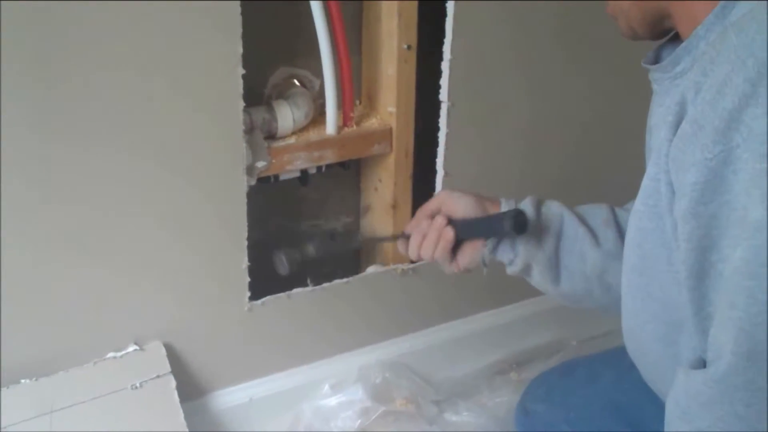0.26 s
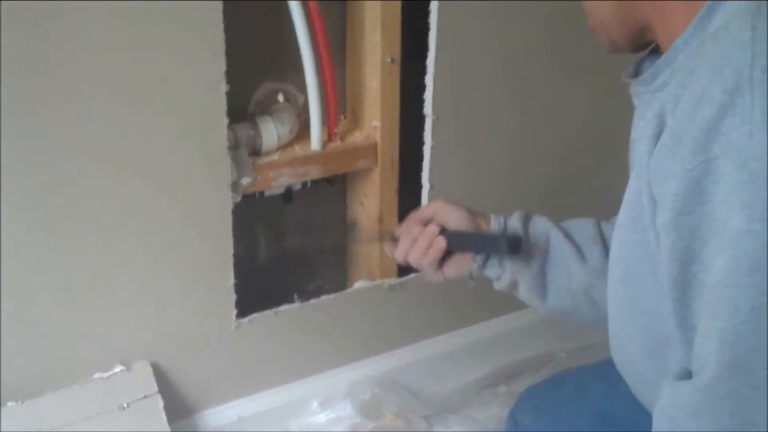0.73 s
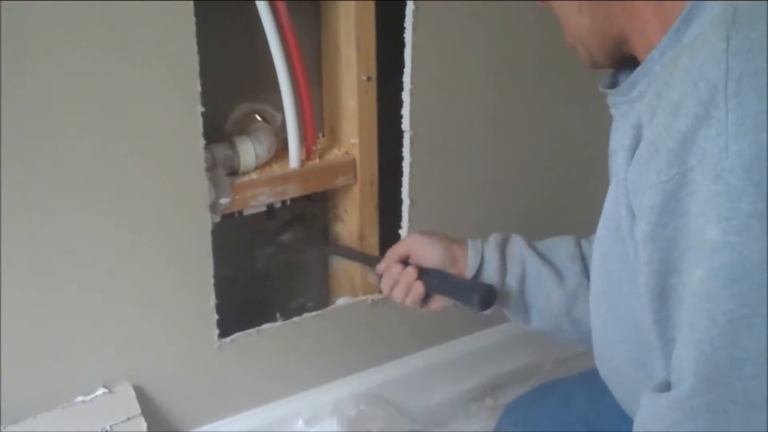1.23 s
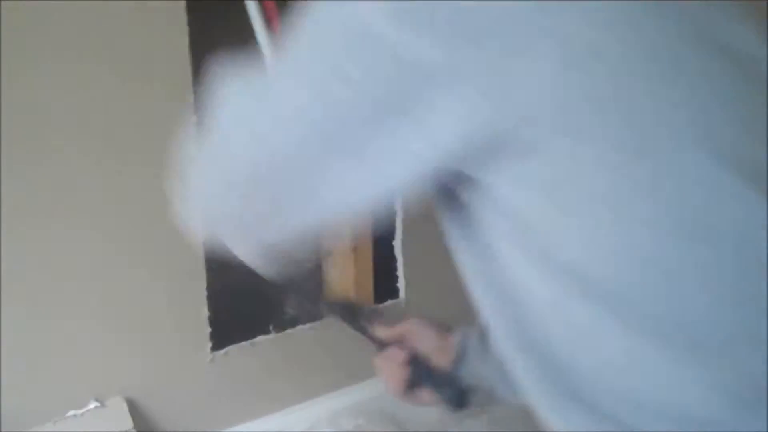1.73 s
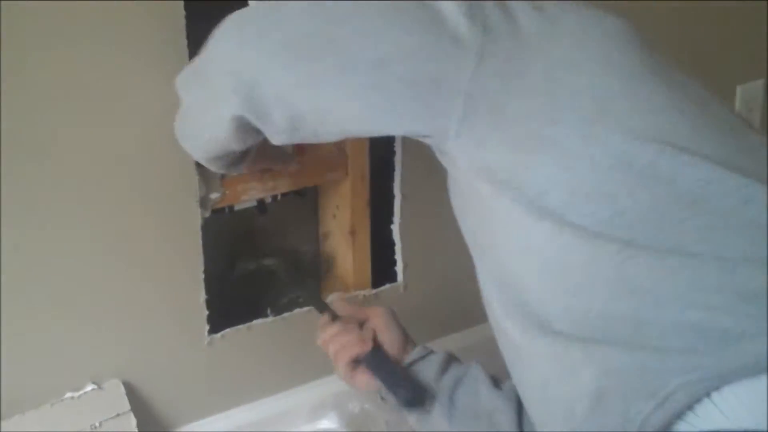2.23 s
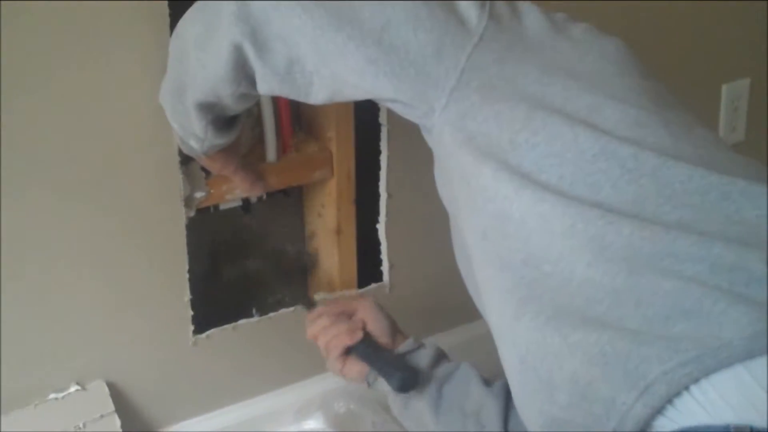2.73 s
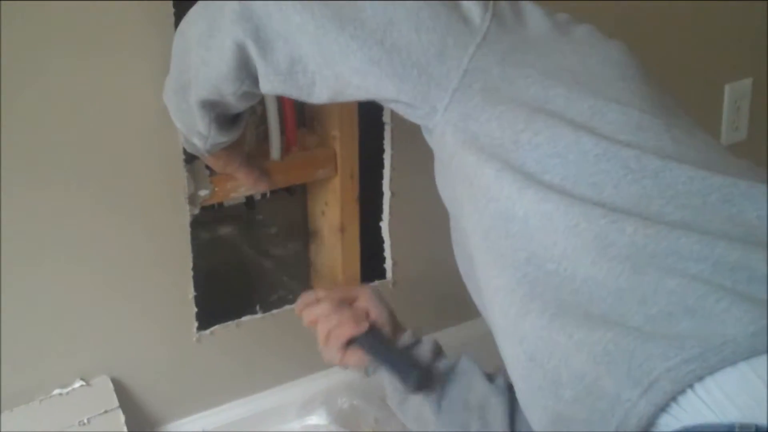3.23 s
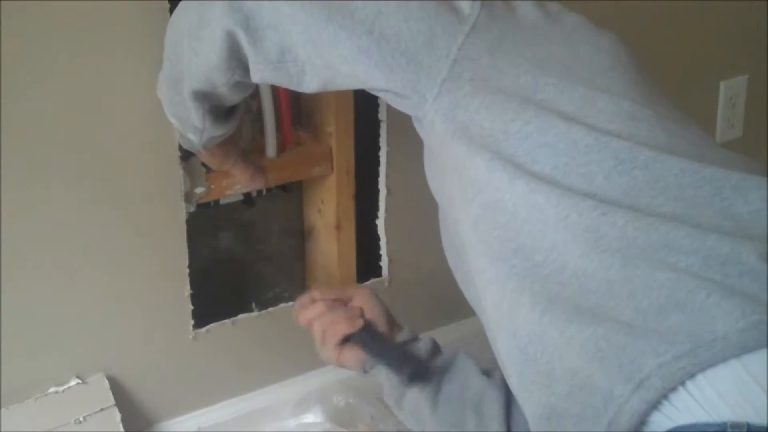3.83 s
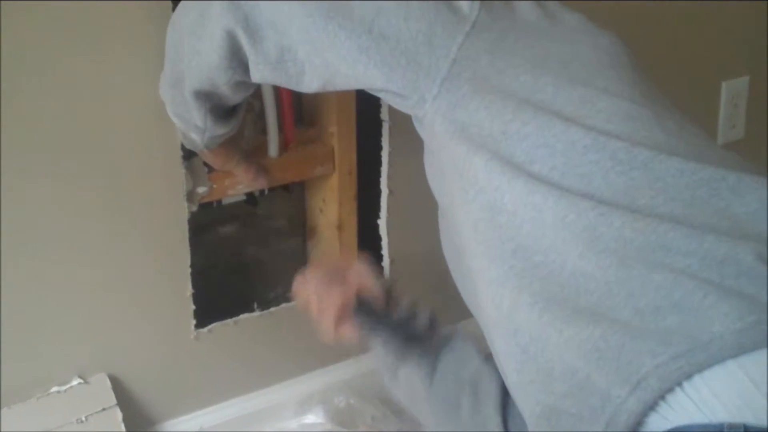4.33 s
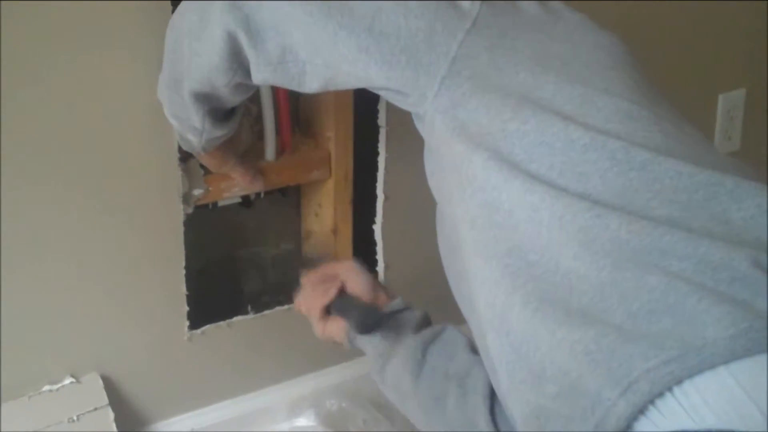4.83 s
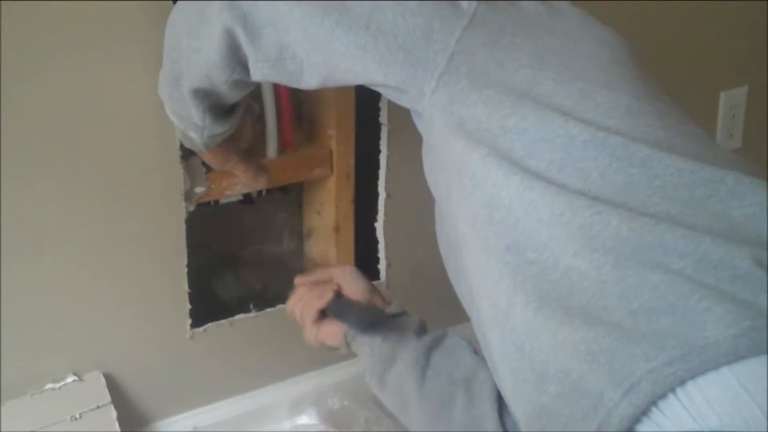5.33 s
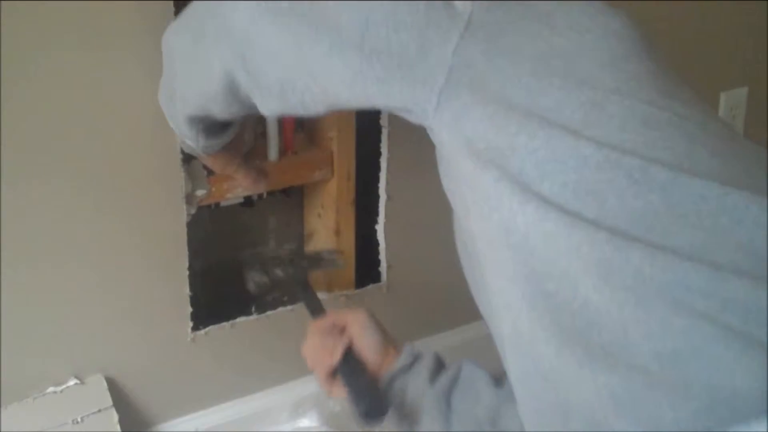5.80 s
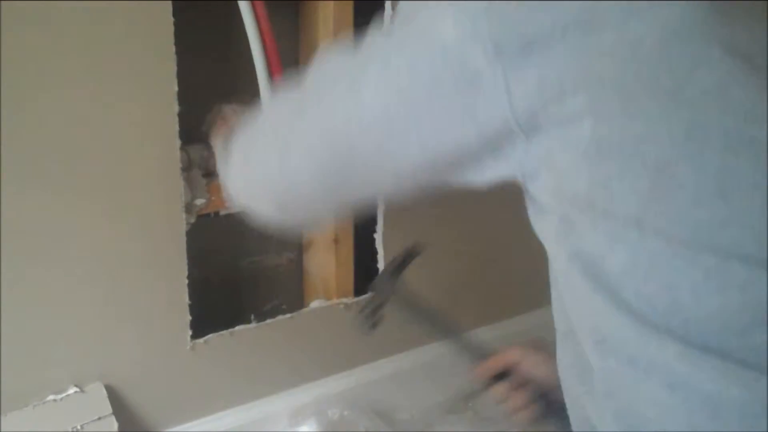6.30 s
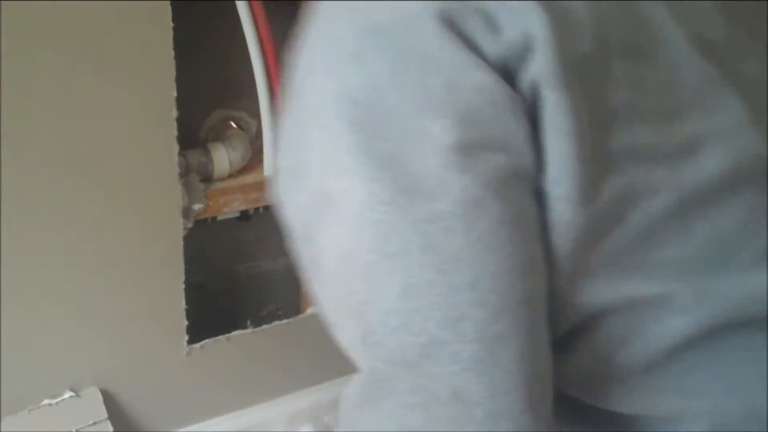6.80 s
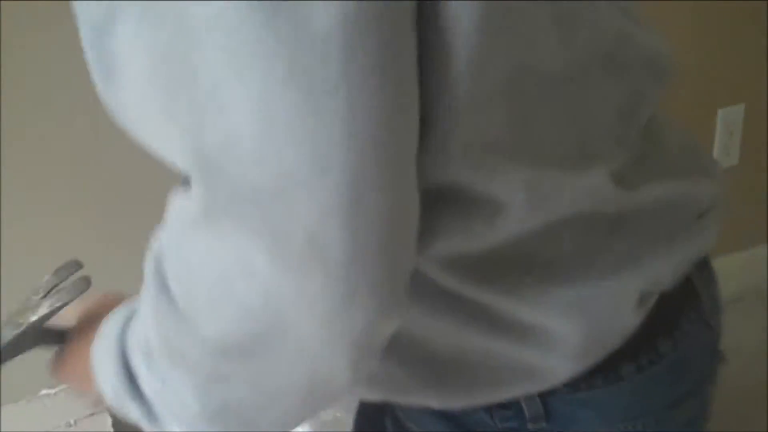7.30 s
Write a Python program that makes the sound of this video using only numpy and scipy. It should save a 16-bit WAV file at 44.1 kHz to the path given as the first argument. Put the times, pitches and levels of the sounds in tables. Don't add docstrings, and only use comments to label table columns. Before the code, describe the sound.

A hammer gives three light, bright taps on wood framing, then a rustling pause and eleven harder knocking blows in a bare room.

```python
import sys
import numpy as np
from scipy import signal
from scipy.fft import rfft, irfft, next_fast_len
from scipy.io import wavfile
from scipy.ndimage import uniform_filter1d

SR = 44100
rng = np.random.default_rng(int(sys.argv[2]) if len(sys.argv) > 2 else 0)


def wav_record(signal):
    frames = np.transpose(np.atleast_2d(signal))
    bounded = np.clip(frames, -1, 1)
    quanta = np.round(bounded * 32767).astype(np.int16)
    wavfile.write(sys.argv[1], SR, quanta)


def amplitude_ratio(level_db):
    exponent = np.asarray(level_db, float) / 20
    return 10 ** exponent


N = 332955
GRID = np.fft.rfftfreq(8192, 1 / SR)


def unit(x):
    return x / np.sqrt(np.mean(x ** 2) + 1e-20)


def along(points, hz):
    f, v = np.transpose(points)
    return np.interp(np.log(hz + 1), np.log(f + 1), v)


def filtered(x, response):
    m = next_fast_len(x.shape[-1] + 8192)
    spectrum = rfft(x, m) * response(np.fft.rfftfreq(m, 1 / SR))
    return irfft(spectrum, m)[..., :x.shape[-1]]


def resonant(peaks):
    def response(f):
        total = 0
        for k, (centre, width, db) in enumerate(peaks):
            damping = 1j * f * width
            total = total + (-1) ** k * amplitude_ratio(db) * damping / (centre * centre - f * f + damping)
        return total
    return response


def part(burst, response, db):
    sound = filtered(burst, response)
    power = np.abs(response(GRID)) ** 2
    return amplitude_ratio(db) * sound / np.linalg.norm(sound), amplitude_ratio(2 * db) * power / power.mean()


def spread(pair):
    # frequency_hz, correlation [0-1]
    likeness = [(20, 0.96), (60, .98), (250, 0.98), (600, 0.93), (1200, 0.81), (3000, 0.44), (6000, 0.25),
                (11000, 0.24)]
    turn = lambda hz: np.arccos(np.clip(along(likeness, hz), -1, 1)) / 2
    mid, side = filtered(pair, lambda hz: np.array([np.cos(turn(hz)), np.sin(turn(hz))]))
    return np.array([mid + side, mid - side])


def add(out, s, parts, wet_db):
    # frequency_hz, t60_s, tail_db
    room = [(60, .5, 3), (140, 0.47, -0.5), (255, 0.28, 8.5), (449, 0.46, 4.5), (809, 0.35, 3),
            (1470, .4, 1.5), (2830, 0.32, -4.5), (4500, 0.3, -1), (5200, 0.33, -9.5), (10100, 0.27, -3.5)]
    room_t60 = [row[:2] for row in room]
    room_db = [row[::2] for row in room]
    sound, power = (sum(p) for p in zip(*parts))
    hz, t, z = signal.stft(rng.standard_normal((2, SR * 3 // 4)), SR, nperseg=256)
    t60 = along(room_t60, hz)[:, None]
    decay = np.hypot(amplitude_ratio(-60 * t / t60), amplitude_ratio(-6.5 - 60 * t / (1.42 * t60)))
    patches = uniform_filter1d(rng.standard_normal(z.shape[1:]), 14, 0)
    clatter_db = unit(uniform_filter1d(patches, 3, 1))
    tail = signal.istft(z * decay * amplitude_ratio(clatter_db), SR, nperseg=256)[1]
    onset = np.clip(np.arange(tail.shape[1]) / (0.0054 * SR), 0, 1)
    tail = spread(tail * onset)
    colour = lambda q: np.sqrt(np.interp(q, GRID, power)) * amplitude_ratio(along(room_db, q) + wet_db)
    wet = filtered(tail / np.linalg.norm(tail[0]), colour)
    wet[:, :sound.shape[-1]] += sound
    start = round(s * SR)
    out[:, start:start + wet.shape[1]] += wet[:, :N - start]


def earlier():
    # frequency_hz, width_hz, level_db
    left_over = [(690, 160, 1), (1890, 40, 7.5), (3000, 480, -7.5), (4200, 1800, -5.5)]
    out = np.zeros((2, N))
    power = part(np.ones(1), resonant(left_over), -17.5)[1]
    add(out, 0, [(np.zeros(1), power)], 0)
    return out


def motion(lag_s):
    # start_s, swell_s, peak_db, fading_db_per_s
    moves = [(1.44, .29, -33, 40.5), (1.76, 0.26, -25, 59.5), (2.399, .23, -51.5, 118.5),
             (6.245, .03, -60, 7.5), (6.3, .25, -55.5, 38), (6.63, 0.105, -57.5, 48),
             (6.8, 0.11, -59.5, 17), (6.965, 0.027, -46.5, 36), (7.3, 0.1, -52.5, 90.5),
             (7.41, .022, -38.5, 250), (7.45, .015, -48.5, 45.5), (7.5, 0.065, -42.5, 50)]
    start, swell, db, fading = np.transpose(moves)[..., None]
    since = np.arange(N) / SR - lag_s - start
    fade = amplitude_ratio(db - fading * np.maximum(since - swell, 0))
    return np.sum(np.clip(since / swell, 0, 1) * fade, axis=0)


def air():
    # frequency_hz, density_db
    tone_colour = [(20, -5), (35, 0), (60, -3), (90, -8), (300, -7), (800, -21.5), (3000, -9),
                   (8500, -18.5), (11000, -36)]
    tone = unit(filtered(rng.standard_normal((2, N)), lambda hz: amplitude_ratio(along(tone_colour, hz))))
    low = unit(filtered(rng.standard_normal((2, N)), lambda hz: resonant([(60, 90, 0)])(hz) ** 2))
    shuffle = amplitude_ratio(-20) * motion(lag_s=0.096) + amplitude_ratio(-77)
    return spread(amplitude_ratio(-72.5) * tone + shuffle * low)


def struck(blows, bounces, thud_db, room_db, room_per_db):
    rows = []
    for s, db, wood_db, face_hz in blows:
        rows.append((s, db, wood_db + thud_db, wood_db, face_hz, room_db + room_per_db * db))
    for s, db, wood_db in bounces:
        rows.append((s, db, wood_db, wood_db, 3080, -8.5))
    return rows


def hammer(blows, timber, modes, steel, ring_db):
    # frequency_hz, width_hz, level_db
    panel = [(88.7, 30, -11.5), (136, 6.7, 1.5), (218.5, 26, -0.5), (363, 72, -4.5)]
    # frequency_hz, level_db
    crack_colour = [(300, -13.5), (700, -2.5), (1500, -6), (3000, 0.5), (4500, -4), (6000, -5.5),
                    (8500, -15.5), (10500, -18.5)]
    out, t = np.zeros((2, N)), np.arange(SR // 2) / SR
    hit = 1. * (t == 0)
    soft = lambda hz: resonant(panel)(hz) / (1 + 1j * hz / 300) ** 2
    for s, db, thud_db, knock_db, face_hz, wet_db in blows:
        noise = rng.standard_normal((3, 2, len(t)))
        crack_burst = spread(noise[0]) * amplitude_ratio(-60 * t / 0.057)
        crack = part(crack_burst, lambda hz: amplitude_ratio(along(crack_colour, hz)), db + 16)
        face, face_power = part(hit, resonant([(face_hz, 350, 0)]), db + 11)
        head = part(spread(noise[1]) * amplitude_ratio(-60 * t / 0.03), resonant(steel), db + 13)
        claw, _ = part(hit, resonant([(3060, 4.2, 0)]), db + ring_db)
        knock = part(noise[2, 0] * amplitude_ratio(-60 * t / 0.11), resonant(timber), db + knock_db + 19.0)
        landed = [(hz, w, level + rng.normal(0, 11.0)) for hz, w, level in modes]
        ring, ring_power = part(np.roll(hit, 60), resonant(landed), db + 0.18 * knock_db + 9.5)
        thud = part(np.roll(hit, 90), soft, db + thud_db + 19.5)
        parts = [crack, (face, 0.25 * face_power), head, (claw, 0), knock, (ring, 0.45 * ring_power), thud]
        add(out, s, parts, wet_db)
    return out


def snaps():
    # start_s, peak_db, pitch_hz
    creases = [(0.7588, -42, 2800), (1.241, -62.5, 3005), (1.3194, -57, 3040), (1.407, -46, 3810),
               (2.11, -19, 7460), (2.2935, -30, 2740), (2.3243, -30, 4940), (2.3844, -48, 3230),
               (5.9644, -50.5, 3380), (6.0848, -49, 2780), (6.2424, -51, 4160), (6.2877, -48.5, 3940),
               (6.438, -41.5, 3010), (6.4936, -41, 3600), (6.5305, -40, 3420), (6.6488, -49, 3710),
               (6.739, -40, 3290), (6.9192, -43, 3980), (6.984, -48, 5550), (7.0499, -33, 5450),
               (7.2454, -41, 2560), (7.307, -39, 3840), (7.3272, -41, 3480), (7.431, -21.5, 7000)]
    out, t = np.zeros((2, N)), np.arange(SR // 30) / SR
    for s, db, pitch_hz in creases:
        click = spread(rng.standard_normal((2, len(t)))) * amplitude_ratio(-60 * t / 0.022)
        crease = resonant([(pitch_hz, 0.8 * pitch_hz, 0)])
        add(out, s, [part(click, crease, db + 15.0)], -8)
    return out


def bumps():
    # start_s, peak_db, ring_hz, hardness_db
    contacts = [(0.76, -43, 384, 0.5), (1.407, -31, 273, -1), (1.439, -34.5, 170, -14), (1.8, -23, 94, -14),
                (1.828, -23, 136, -9), (1.975, -31.5, 330, 1), (2.031, -25.5, 77.8, -6),
                (2.069, -24.5, 225.4, 0), (7.248, -61, 1100, -7), (7.391, -55, 580, -12),
                (7.43, -30, 726, -1.5), (7.439, -34.5, 497, -7.5), (7.468, -31, 146, 2),
                (7.491, -41.5, 300, -8.5), (7.533, -36, 550, 1)]
    # start_s, peak_db
    slaps = [
        (2.708, -2.5),
        (3.013, -16.5),
    ]
    out, t = np.zeros((2, N)), np.arange(8192) / SR
    boards = []
    for s, db, hz, hard_db in contacts:
        wet_db = 3 - 0.5 * np.log2(hz / 250)
        boards.append((s, db, hz, 0.45 * hz, hard_db, wet_db))
    for s, db in slaps:
        boards.append((s, db, 137, 22, -12.5, -2))
    soft = lambda hz: 1 / (1 + (1j * hz / 1300) ** 2 + 1.2j * hz / 1300) ** 2
    upper_modes = resonant([(450, 200, 0), (950, 700, -2)])
    for s, db, ring_hz, width_hz, hard_db, wet_db in boards:
        contact = rng.standard_normal(len(t)) * amplitude_ratio(-60 * t / .02)
        mode = resonant([(ring_hz, width_hz, 0)])
        board = part(1. * (t == 0), lambda hz: soft(hz) * mode(hz), db + 16.5)
        upper = part(contact, lambda hz: soft(hz) * upper_modes(hz), db + hard_db + 12.0)
        add(out, s, [board, upper], wet_db)
    return out


def rustle():
    # frequency_hz, density_db
    sheet_colour = [(150, -13.5), (400, -9.5), (1000, -8), (2000, -6), (4000, -4), (5500, -5),
                    (8000, -11.5), (10500, -16)]
    level = motion(lag_s=0)
    happens = rng.random((2, N)) < 1500 / SR
    sizes = rng.standard_normal((2, N)) * amplitude_ratio(1.9 * rng.exponential(size=(2, N)))
    raw = rng.standard_normal((2, N)) + .45 * unit(happens * sizes)
    hz, t, z = signal.stft(raw, SR, nperseg=512)
    patches = uniform_filter1d(rng.standard_normal(z.shape[1:]), 10, 0)
    patchy_db = 1.8 * unit(uniform_filter1d(patches, 5, 1))
    speed_db = 20 * np.log10(np.interp(t, np.arange(N) / SR, level) + 1e-3)
    tilt_db = 0.23 * (speed_db + 35) * np.log2((hz[:, None] + 300) / 4000)
    z = z * amplitude_ratio(patchy_db + tilt_db + along(sheet_colour, hz)[:, None])
    return level * unit(spread(signal.istft(z, SR, nperseg=512)[1][:, :N]))


def scene():
    # start_s, crack_db, wood_over_crack_db, face_hz
    taps = [
        (0.1434, -1.5, -16.5, 3156),
        (0.5087, -3.5, -16.5, 4210),
        (0.8739, -8.5, -14.5, 3000),
    ]
    # start_s, crack_db, wood_over_crack_db, face_hz
    cross_blows = [(2.6892, 0, -8, 4100), (2.9882, 6.5, -9.5, 4030), (3.2859, 2.5, -7, 4100),
                   (3.5688, -1, -10.5, 4500), (3.8501, -3, -11, 4400), (4.1215, -5, -12.5, 4100),
                   (4.4079, -9, -11.5, 4310), (4.7174, -11.5, -8, 4120), (5.0004, -7.5, -8.5, 4060),
                   (5.2909, -5, -6.5, 4200), (5.5832, -6, -9.5, 4040)]
    # start_s, crack_db, wood_over_crack_db
    bounces = [(0.1512, -10, -8), (0.1982, -33, -5), (3.0327, -15, 8), (3.322, -5, -7.5),
               (3.614, -28.5, -3), (4.1677, -17, -9), (4.4501, -19.5, -2.5), (4.7765, -26, 1),
               (5.0519, -17.5, -3), (5.3318, -18.5, -6), (5.628, -24, -6.5)]
    # frequency_hz, width_hz, level_db
    brace = [(343, 48, -4.5), (431, 36, -8), (510, 60, -6), (696, 78, -0.5), (1000, 85, -18),
             (1260, 120, -21.5)]
    # frequency_hz, width_hz, level_db
    brace_modes = [(249, 18, -5), (423, 20, -12), (700, 24, -2.5), (1310, 28, -3), (1680, 34, -4),
                   (1916, 20, -9), (2400, 37, 2), (3000, 35, -4.5), (4200, 40, -9)]
    # frequency_hz, width_hz, level_db
    steel_brace = [(1660, 54, 1.5), (2220, 50, 2), (3040, 99, 10), (4210, 120, 16.5), (6200, 2100, 11.5)]
    # frequency_hz, width_hz, level_db
    cross_piece = [(450, 37, -2), (531.7, 25, 2.5), (647, 67, 2), (836.4, 32, 3), (1076, 240, -5.5),
                   (1404, 30, -8)]
    # frequency_hz, width_hz, level_db
    frame_modes = [(464, 15, -1.5), (484, 14, -9.5), (670, 19, -6.5), (791, 24, 1.5), (1200, 15, -6),
                   (1433, 26, -3.5), (1435, 11, -7.5), (1627, 31, -10), (1817, 60, -0.5), (2140, 28, -2.5),
                   (2360, 20, -6.5), (2440, 30, -9.5), (3160, 16, -7.5)]
    # frequency_hz, width_hz, level_db
    steel_cross = [(1743, 60, -1), (2397, 140, 1.5), (3010, 160, -1), (4360, 710, -15.5), (7000, 420, -11)]
    brace_rows = struck(taps, bounces[:2], thud_db=-4, room_db=-6.5, room_per_db=-0.41)
    cross_rows = struck(cross_blows, bounces[2:], thud_db=-3.5, room_db=-2.5, room_per_db=-0.48)
    on_brace = hammer(brace_rows, brace, brace_modes, steel_brace, ring_db=-8.0)
    on_cross = hammer(cross_rows, cross_piece, frame_modes, steel_cross, ring_db=-25.5)
    return earlier() + air() + on_brace + on_cross + snaps() + bumps() + rustle()


def smear(x):
    # frequency_hz, level_db
    rounding = [(300, -18.5), (1500, -12), (4000, -16.5), (10000, -1.5)]
    frame_s, first_s = .064, .005
    n = round(frame_s * SR)
    starts = np.round(np.arange(first_s, N / SR, frame_s / 2) * SR).astype(int)
    index = starts[:, None] + np.arange(n)
    window = np.sin(np.pi * (np.arange(n) + .5) / n)
    z = rfft(np.pad(x, ((0, 0), (0, n)))[:, index] * window)
    shape = np.sqrt(np.abs(uniform_filter1d(np.abs(z) ** 2, size=20, axis=2)))
    gain = amplitude_ratio(along(rounding, np.fft.rfftfreq(n, 1 / SR)))
    phase = np.exp(2j * np.pi * rng.random(z.shape))
    noise = irfft(gain * shape * phase, n) * window
    return x + np.array([np.bincount(index.ravel(), c.ravel())[:N] for c in noise])


def roll_off(x):
    return signal.sosfilt(signal.butter(12, 11700, fs=SR, output="sos"), x)


def record(dry):
    # frequency_hz, left_minus_right_db
    imbalance = [(60, 1.5), (500, 1), (2000, 1.5), (4000, 1), (9000, -2)]
    halves = np.array([[.5], [-.5]])
    bass_cut = lambda hz: (1j * hz / (1j * hz + 31)) ** 2
    x = filtered(dry, lambda hz: amplitude_ratio(along(imbalance, hz) * halves) * bass_cut(hz))
    x = x / (1 + np.abs(x / 0.98) ** 6) ** (1 / 6)
    x = filtered(smear(x), lambda hz: 1 / (1 + (hz / 10400) ** 80))
    return roll_off(np.clip(x, -1, 1))


dry = scene()
out = record(dry)
wav_record(out)
```